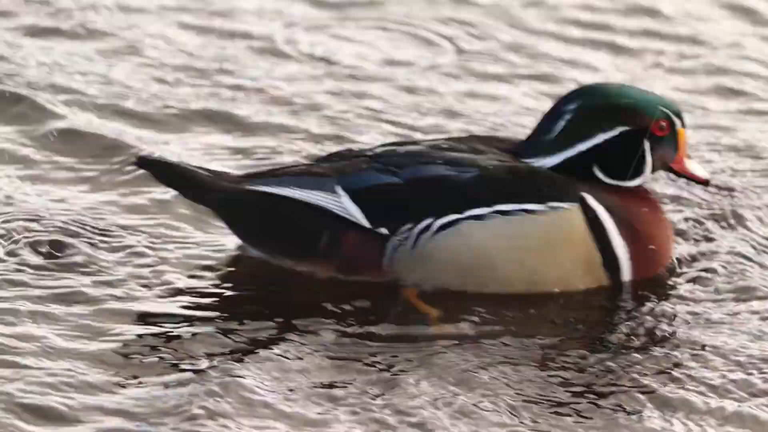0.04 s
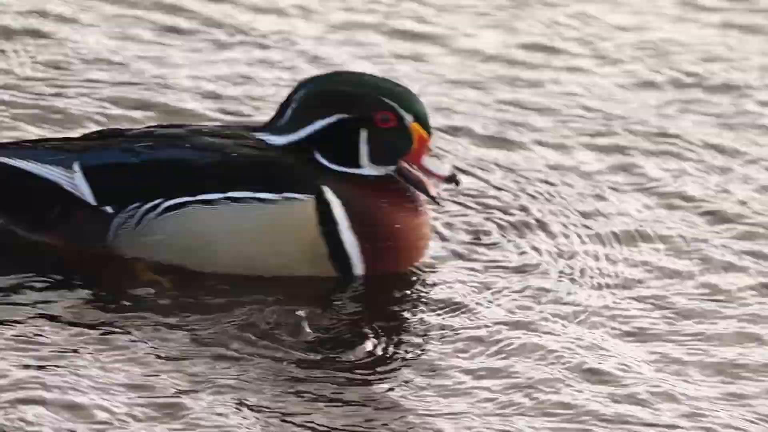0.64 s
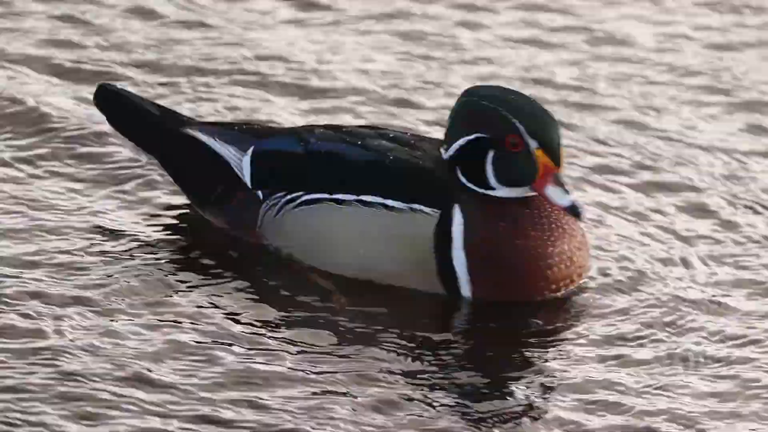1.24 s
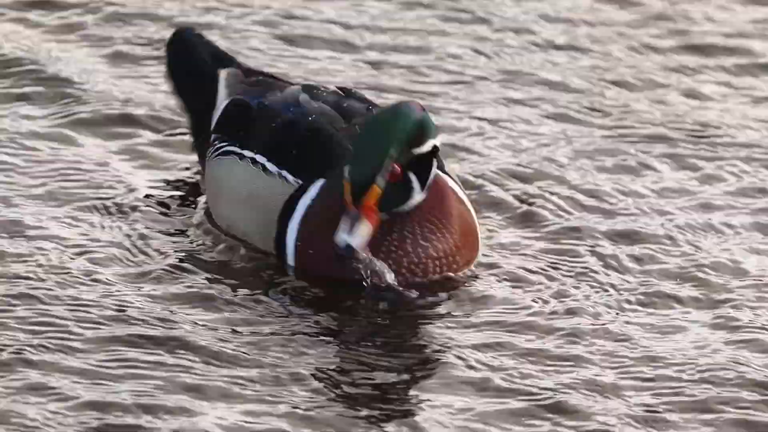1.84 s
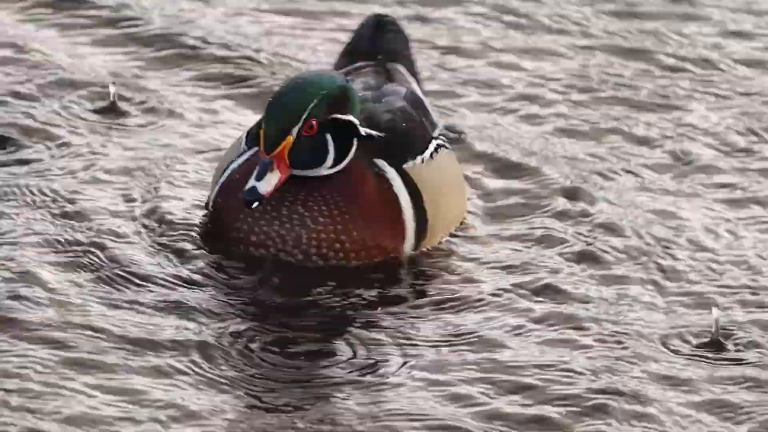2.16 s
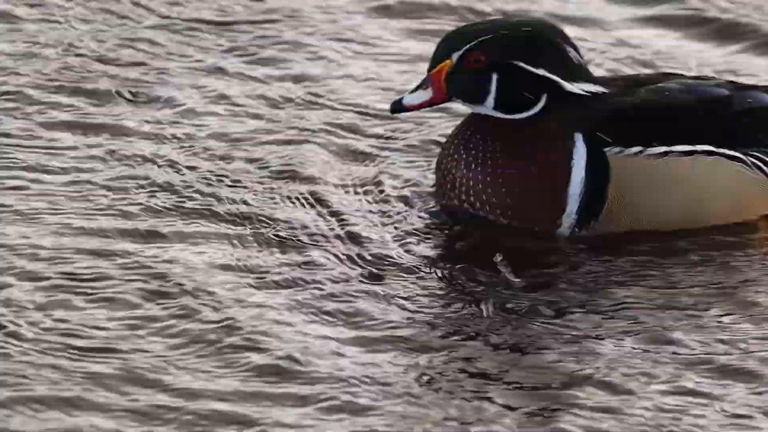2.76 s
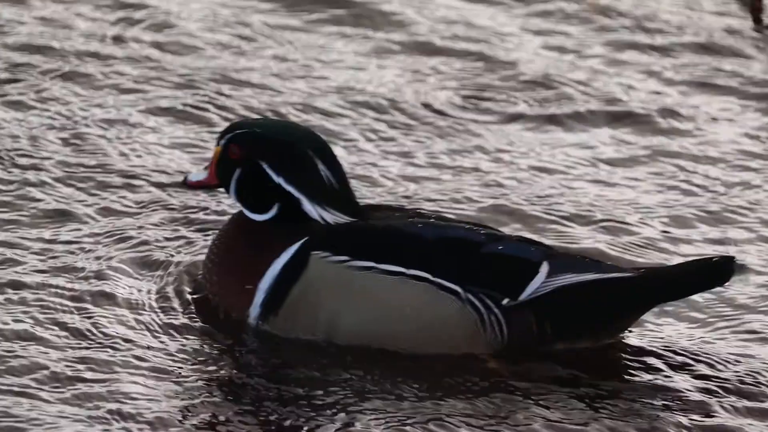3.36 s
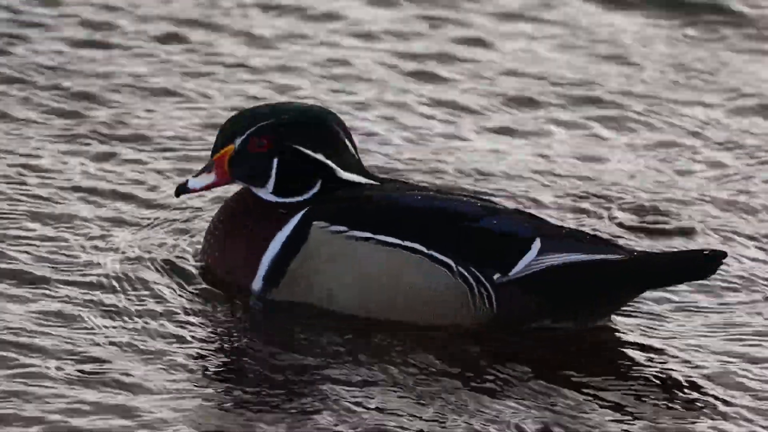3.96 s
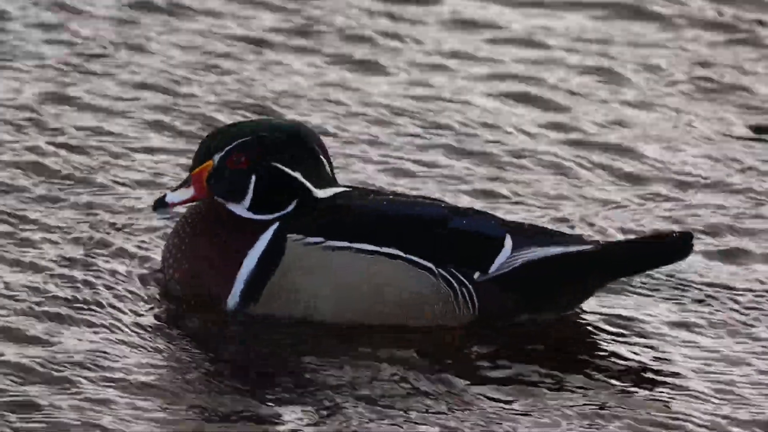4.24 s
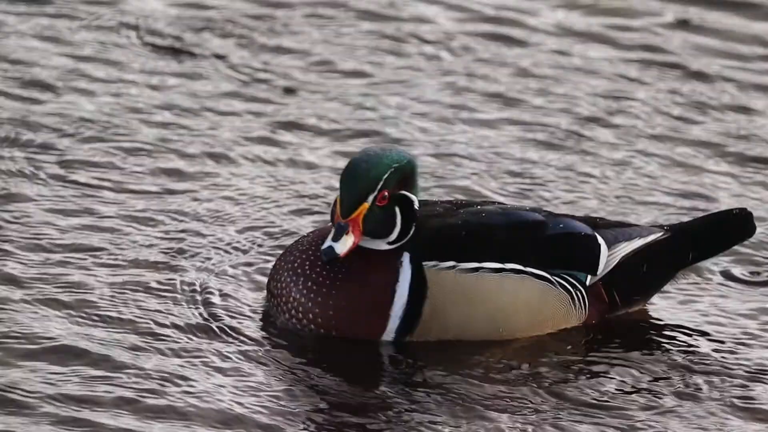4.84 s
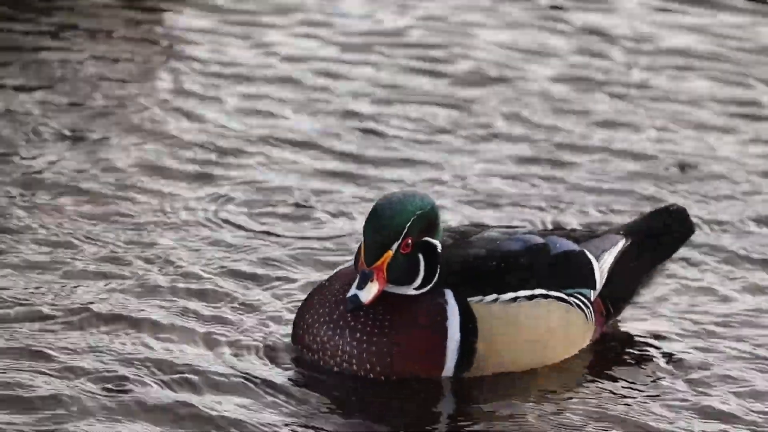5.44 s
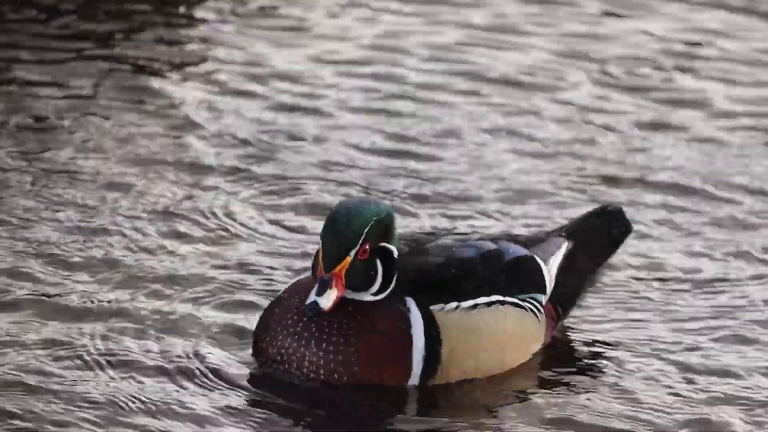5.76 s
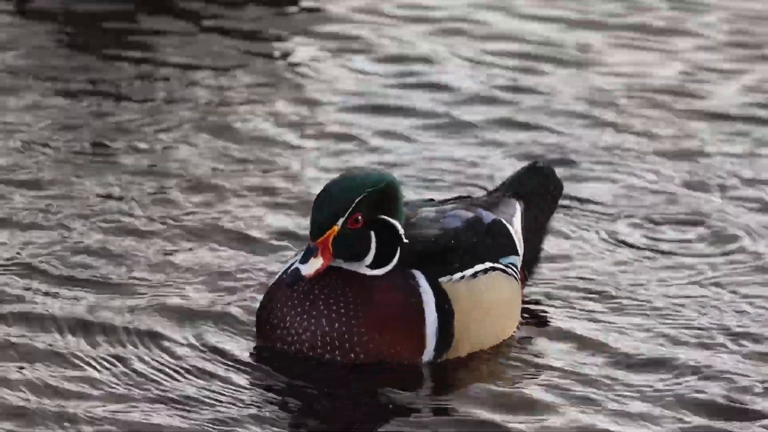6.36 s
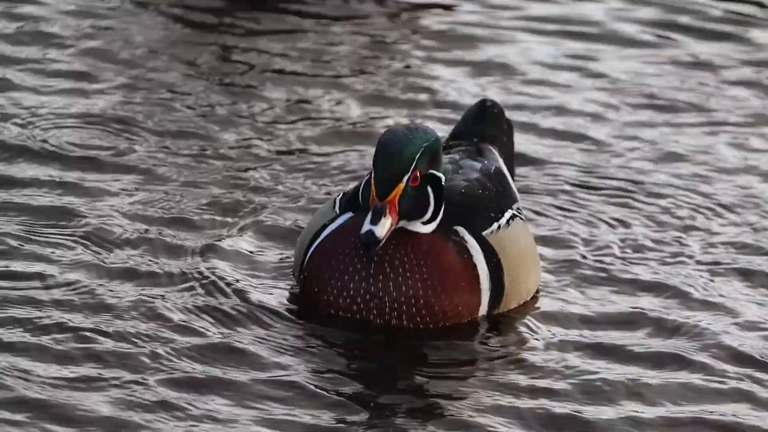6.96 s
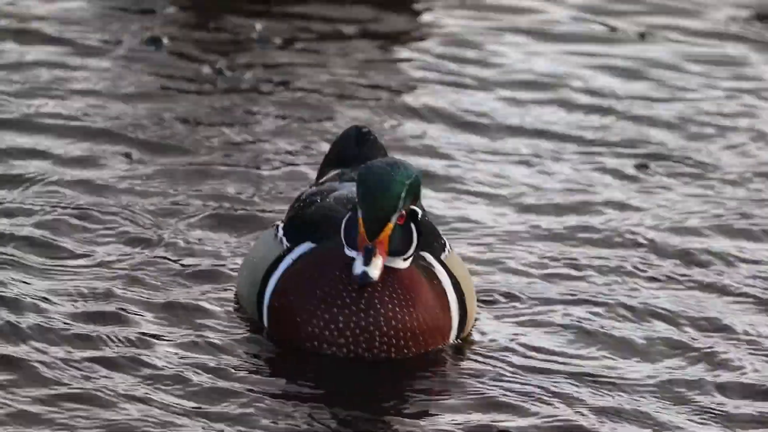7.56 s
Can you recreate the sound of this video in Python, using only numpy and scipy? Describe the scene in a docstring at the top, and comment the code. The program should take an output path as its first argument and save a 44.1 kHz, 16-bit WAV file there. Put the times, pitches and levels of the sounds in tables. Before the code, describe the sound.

Uneven gusts of wind knock and rumble against the microphone beside a pond. Beneath them a duck whistles in thin, wavering notes and squeaks, while other ducks quack in quiet, quick pulses. The quacking stops a little past halfway, a strong gust hits, and near the end comes a longer whistle arching up and back down. Light rain hisses and ticks on the water all along, with an occasional tiny bubble.

```python
"""Thin, squeaky whistles rise out of soft duck chatter, thumps of wind and light rain on a pond.
A drake makes them with his voice box, throat and bill; the last is a long arch, up and back down.
The other ducks quack in quick, buzzy pulses. Raindrops tick, and a few trap bubbles that ring.
Gusts push swirls of air over the microphone's two openings, and the hardest thumps make its
limiter turn everything down for a moment."""
import sys
import numpy as np
from scipy import signal
from scipy.fft import rfft, irfft, next_fast_len
from scipy.io import wavfile
from scipy.ndimage import uniform_filter1d, minimum_filter1d

SR = 44100
rng = np.random.default_rng(int(sys.argv[2]) if len(sys.argv) > 2 else 0)


def dump_mix(stems):
    """Bounce the given channels to the path in sys.argv[1] as a 16-bit WAV at rate SR."""
    frames = np.atleast_2d(stems).T  # one column per channel
    limited = np.clip(frames, -1, 1)  # hard clip at full scale
    pcm = np.round(limited * 32767).astype(np.int16)
    wavfile.write(sys.argv[1], SR, pcm)


N = 335601
T = np.arange(N) / SR

# Levels in the tables are relative. pan_db is left minus right, so below zero means to the right.
# The drake's four long whistles. A harmonic is a tone at a whole multiple of the pitch.
# time_s, pitch_hz, level_db, favoured_harmonic
FALLING = [(0.718, 1507, -46, 2.6), (0.742, 1745, -42, 2.7), (0.765, 1654, -42, 2.6),
           (0.792, 1520, -45, 2.4), (0.825, 1530, -47, 3), (0.89, 1450, -55, 5.8), (0.92, 1290, -56, 5),
           (0.95, 1113, -59, 5)]
WAVERING = [(1.39, 1340, -51, 6.3), (1.42, 1560, -43, 4.9), (1.44, 1590, -38.5, 4.4),
            (1.47, 1517, -42, 5.4), (1.5, 1450, -49, 4), (1.526, 1443, -46, 4), (1.556, 1520, -45, 4.6),
            (1.59, 1514, -43.5, 5.5), (1.63, 1596, -41, 5), (1.66, 1574, -43, 4.6), (1.68, 1505, -45, 3.4),
            (1.7, 1330, -47, 4.1), (1.715, 1220, -59, 4.3)]
CURLED = [(2.435, 1266, -48, 3.5), (2.45, 1434, -39, 3.7), (2.463, 1520, -35.5, 2.9),
          (2.482, 1384, -45, 3.6), (2.5, 1286, -41, 3.4), (2.519, 1220, -46, 4.3), (2.532, 1220, -57, 4.3)]
ARCHED = [(6.768, 1100, -59, 3.5), (6.798, 1517, -46, 3.3), (6.823, 1260, -44.5, 3.6),
          (6.85, 1840, -42, 3.5), (6.872, 1740, -43, 3.7), (6.9, 2240, -38, 3.54), (6.918, 2300, -42, 3.56),
          (6.96, 2790, -40, 3.4), (6.985, 2985, -38.5, 3.3), (7.033, 3070, -39, 2.9),
          (7.083, 2830, -37.5, 3.4), (7.11, 2590, -42, 3.5), (7.13, 2340, -42, 3.46),
          (7.15, 1970, -39, 4.1), (7.172, 1594, -45, 4.8), (7.2, 1400, -60, 5.5)]
# How he voices each one. More falloff weakens the harmonics far from the favoured one.
# whistle_table, gain_db, falloff_db, hoarse_db, pan_db
LONG_CALLS = [(FALLING, -.5, 3.8, 2, -6.5), (WAVERING, 0, 4.8, 0.98, -8.5), (CURLED, -.5, 12, 1, -4.5),
              (ARCHED, 0, 15.3, -1, -8)]
# His short squeaks: start_s, length_s, top_pitch_hz, curl_octaves, level_db, favoured_harmonic, falloff_db
SQUEAKS = [(0.366, 0.11, 1570, 0.18, -53, 3.86, 2), (1.1, 0.061, 1637, 0.18, -50, 4.5, 5),
           (1.83, 0.03, 1620, .25, -54, 2.7, 19), (1.852, 0.06, 1247, 0.093, -47.5, 2.6, 21),
           (1.912, 0.041, 1460, 0.29, -46.5, 1.6, 9), (3.32, 0.053, 1445, 0.26, -49, 4.3, 13.5),
           (4.006, 0.062, 1295, .25, -47.5, 2.7, 12), (4.375, 0.039, 1220, 0.23, -49.5, 5.9, 2),
           (6.673, 0.068, 1250, 0.37, -49.5, 4, 6), (6.725, 0.06, 1130, 0.274, -47.5, 3.6, 1)]
# How his throat and bill boost or weaken each frequency: frequency_hz, gain_db
THROAT = [(1500, -24), (2400, -8), (3100, 7), (3900, 3.5), (4600, 1.5), (6100, 2), (7700, -2), (9000, -3),
          (10600, -5), (12200, 0.5), (14500, -11)]
# The other ducks' quacks: middle_s, length_s, level_db, pitch_hz, pulses_per_s, bill_overtone_db
QUACKS = [(0.009, 0.045, -39.5, 2180, 100, -9.5), (0.152, 0.066, -33.5, 2254, 97, -30),
          (0.266, 0.11, -35, 2195, 101, -19.5), (0.415, 0.066, -33, 2373, 92, -21.5),
          (0.603, 0.089, -40.5, 2007, 93, -23), (0.877, 0.086, -35.5, 2080, 105, -20),
          (0.954, 0.0767, -38, 2296, 100, -27), (1.188, 0.099, -36, 2155, 127, -24),
          (1.44, 0.12, -35.5, 2047, 103, -22), (1.772, 0.095, -39.5, 1922, 98, -26),
          (2.036, 0.1, -34, 2058, 101, -27), (2.372, 0.115, -36, 2040, 94, -25),
          (2.602, 0.1, -32.5, 2070, 99, -33), (2.948, .065, -40.5, 2060, 106, -28),
          (3.191, 0.089, -36.5, 2044, 87, -26), (3.541, 0.085, -40, 1922, 84, -27),
          (4.149, 0.11, -42, 1933, 92, -25), (4.405, 0.052, -40, 1998, 90, -22)]
# Gusts of wind: middle_s, length_s, level_db
GUSTS = [(0.122, .07, -35), (0.397, 0.17, -39.5), (0.702, 0.034, -28), (0.787, 0.07, -36),
         (0.987, 0.087, -33), (1.214, 0.057, -37), (1.368, 0.095, -34.5), (1.545, 0.099, -27.5),
         (1.716, 0.1, -29), (2.03, 0.075, -35), (2.193, 0.16, -39), (2.521, 0.17, -39.5),
         (2.917, 0.17, -31.5), (3.14, 0.0357, -32), (3.27, 0.14, -30.5), (3.408, 0.03136, -30),
         (3.785, 0.1, -28), (4.302, 0.0942, -38.5), (4.41, 0.037, -25), (4.587, 0.076, -34.5),
         (4.722, 0.077, -33), (5.164, 0.21, -41.5), (5.45, 0.13, -24.5), (5.589, 0.0725, -30),
         (5.75, .13, -15.5), (5.995, 0.3, -36), (6.224, 0.076, -30.5), (6.42, 0.17, -26),
         (6.806, 0.11, -26), (6.895, 0.17, -30), (7.036, 0.11, -29.5), (7.193, 0.023, -32),
         (7.409, 0.19, -40)]
# The hardest thumps of wind on the microphone: time_s, level_db, centre_hz, pan_db
THUMPS = [(0.096, -8, 413, 0), (0.1105, -10, 566, 0), (0.154, -13.5, 453, 2), (0.425, -10.5, 620, -2),
          (0.448, -6, 644, -4), (0.6402, -5, 554, 5), (0.685, -9.5, 536, 8.5), (0.69, -6, 620, 3),
          (0.697, -7, 526, 5), (0.7136, -4, 386, -0.5), (1.0263, -8.5, 358, 3), (1.034, 1, 570, 10.5),
          (1.0481, -6, 535, 7), (1.28, -8, 475, -6.5), (1.485, 0, 575, -6), (1.513, -10, 297, 2),
          (1.5281, -10, 400, 12), (1.547, -9.5, 317, -2), (1.5534, -6.5, 300, 4), (1.5589, -4.5, 373, 4),
          (1.6752, -11, 437, -9), (1.6924, -9, 430, -10), (1.7438, -8, 525, -18), (1.758, -1.5, 453, -3.5),
          (1.7689, -3.5, 524, -3), (1.777, -1.5, 660, -9), (1.7878, -3.5, 840, -28),
          (1.9129, -5, 456, -5.5), (1.939, -11, 352, -1), (2.0576, -3.5, 446, -5),
          (2.1987, -17.5, 354, 7.5), (2.4541, -10.5, 472.4, -11), (2.462, -17, 406, -6),
          (2.5607, -15, 460, -17), (2.569, -13.5, 334, -11), (2.851, 1, 760, -20), (2.8878, -9, 374, -4),
          (2.899, -4, 387, -7), (2.9329, -7, 500, -18.5), (2.966, -14, 500, -6), (3.0609, -13, 334, 2),
          (3.0718, -15.5, 474, 8), (3.1298, -15.5, 380, 3), (3.2231, -2.5, 540, 9), (3.264, -6.5, 402, -12),
          (3.2701, -7, 380, -8.5), (3.2799, -8.5, 266.4, 9), (3.289, -4, 310, -5), (3.31, -13, 336, -1),
          (3.441, -9.5, 350, 5), (3.698, -8.5, 430, 6), (3.743, -7.5, 400, 7), (3.7577, -9, 400, 0.5),
          (3.7748, 9, 456, -1), (3.88, -13.5, 288, -5), (4.4041, -0.5, 380, -23), (4.431, -12, 366, -11),
          (4.611, -12.5, 506, 7), (4.7474, -16, 560, -6), (5.2514, -18, 233, -2), (5.3291, -13.5, 477, 9),
          (5.338, -14, 480, 15), (5.3735, -10.5, 439, 21.5), (5.4302, -4, 496, -2), (5.4494, -1.5, 560, -8),
          (5.465, -4, 611, -20), (5.4894, -8, 548, -18), (5.5105, -13.5, 403, -6), (5.5689, -9.5, 418, -10),
          (5.5802, -5, 356, -1), (5.6535, -9, 390, 6), (5.698, 1, 750, -17), (5.709, 4.5, 864, 11),
          (5.7116, 4, 910, 16), (5.7259, 18, 857, 25), (5.753, 6, 690, 3), (5.794, 5, 680, 12),
          (5.801, 6, 656, 7), (5.807, 1.5, 1010, 25), (5.8225, -1, 610, 6), (5.8725, -6, 644, -38.5),
          (5.9014, -8.5, 476, -2), (6.103, -3, 474, 6.5), (6.167, -12.5, 500, 9), (6.178, -12, 372, 3),
          (6.223, -11, 287, 3), (6.394, -9.5, 340, 6.5), (6.4325, -12, 345, 11), (6.4948, -9.5, 317.5, 1),
          (6.5669, -6.5, 556, 6), (6.742, 7, 517, 9), (6.7454, 4.5, 1070, 22), (6.7488, 12, 684, 16),
          (6.828, 0.5, 710, 19), (6.832, 9, 447, 8), (6.8686, -6, 363, -5), (6.884, -6, 340, 12),
          (6.9048, -7.5, 335, 3), (6.9408, -8, 463, 14), (6.9754, -8.5, 334, 5), (6.986, -7, 420, -8),
          (6.9963, -5.5, 560, -14), (7.0448, -12, 424, -2.5), (7.0584, -11, 420, -4),
          (7.0733, -8.5, 490, -11), (7.088, -10, 502, -6)]
# The nearest raindrops: time_s, level_db, centre_hz, pan_db
NEAR_DROPS = [(0.1933, -12.5, 4690, -20), (0.224, -20.5, 3880, 5), (0.3313, -23, 3260, -11),
              (0.705, -9.5, 8700, 5), (1.161, -26, 3393, -9), (1.221, -29, 5430, -6),
              (1.278, -25, 4835, -13), (1.8939, -25, 3044, -8), (2.26, -23.5, 4388, 3),
              (2.332, -17.5, 3360, -12), (2.563, -26, 3680, -7), (2.701, -25, 3130, -16),
              (3.142, -27.5, 3070, -2), (3.447, -27.5, 3390, -14), (3.5161, -24, 3110, -4),
              (3.6839, -28.5, 3203, 9), (4.0818, -27, 4910, -10), (4.175, -24, 3466, 1),
              (5.029, -27.5, 3050, -19), (6.2481, -26.5, 3250, -38), (6.4742, -20, 4942, -16),
              (7.4694, -26, 3310, 0)]
# Bubbles trapped by drops: start_s, level_db, pitch_hz
BUBBLES = [(0.994, -32, 4030), (4.18, -26, 790), (4.52, -27, 805), (7.231, -38.5, 3954),
           (7.283, -31.5, 3165)]
# The tone of the wash of rain and far water: frequency_hz, level_db
WASH_TONE = [(18, -57.5), (30, 4), (64, -1.5), (124, 1.5), (287, -6.5), (616, -5.5), (2170, -9),
             (3490, -17), (4420, -24.5), (14800, -34.5), (16000, -31)]
# How that wash swells and sinks: time_s, level_db, extra_treble_db
WASH_SWELL = [(0, 4.5, 5), (1, 2, 2), (2, 2, 0), (3, 3.5, 1), (4, 2, 1), (5, 2.5, -5), (6, 1, -2),
              (7.6, 1, 1.5)]


def drake_whistles(glide_s=.01, crest_share=.28, crest_width=.26, effort_db_per_octave=19):
    """Long calls glide in pitch; each short squeak curls up to a loud crest, drops and levels out."""
    out = np.zeros((2, N))
    for points, gain_db, falloff_db, hoarse_db, pan_db in LONG_CALLS:
        start, end = points[0][0], points[-1][0]
        smooth = uniform_filter1d(np.array(curves(points)), int(glide_s * SR))
        hz, level_db, favoured = smooth[:, (T >= start) & (T < end)]
        call = voice_box(hz, level_db + gain_db, favoured, falloff_db, hoarse_db)
        add(out, start, sides(pan_db) * call)
    for start, length, top_hz, depth, db, favoured, falloff_db in SQUEAKS:
        from_crest = (np.linspace(0, 1, int(length * SR)) - crest_share) / crest_width
        octaves = -depth * from_crest ** 2 / (1 + from_crest ** 2)
        level_db = db + effort_db_per_octave * octaves
        squeak = voice_box(top_hz * 2 ** octaves, level_db, favoured / 2 ** octaves, falloff_db, 0)
        add(out, start, sides(pan_db=-8) * squeak)
    return out


def voice_box(hz, level_db, favoured, falloff_db, hoarse_db, rasp_db=-11.5, air_db=-11.5):
    """A slightly hoarse stack of harmonics: each one flutters, and air hisses in the gaps."""
    n = len(hz)
    wobble = 1 + .005 * walk(500)[:n] + .003 * walk(72)[:n]
    phase = 2 * np.pi * np.cumsum(hz * wobble) / SR
    harmonic = np.arange(1, 10)[:, None]
    throat_hz, throat_db = np.transpose(THROAT)
    boost_db = np.interp(np.log(harmonic * hz), np.log(throat_hz), throat_db)
    gains = undb(boost_db - falloff_db * np.log2(1 + np.abs(harmonic - favoured)))
    gains *= low_pass(harmonic * hz, 15100, order=14)  # the bill passes little above this
    gains /= np.linalg.norm(gains, axis=0)
    noise = rng.standard_normal((2, 2, len(harmonic), n))
    rasp = unit(signal.lfilter(*signal.butter(2, 250, fs=SR), noise[0]))
    air = unit(signal.lfilter(*signal.butter(2, hz.max() / 2, fs=SR), noise[1]))
    husky_db = np.clip(-42 - level_db, 0, 8) * .5  # soft notes hold more air
    roughness = undb(rasp_db) * rasp + undb(air_db + husky_db) * air
    flutter = undb(hoarse_db) * roughness * (harmonic / 3.5) ** .7  # high harmonics are roughest
    tones = (1 + flutter[0]) * np.sin(harmonic * phase) + flutter[1] * np.cos(harmonic * phase)
    fade = np.clip(np.minimum(T[:n], T[:n][::-1]) / .009, 0, 1)
    shimmer_db = 2 * walk(122.3)[:n]
    return np.sqrt(2) * fade * undb(level_db + shimmer_db) * (gains * tones).sum(axis=0)


def duck_chatter(sweep=1.45, turn_share=.36, throat_octaves=1.1, air=.85, gain_db=2.4):
    """Each quack is a rattle of tiny squeaks and puffs of air, ringing in the throat and bill."""
    drift = np.exp(.1 * walk(130))
    strength = undb(1.6 * walk(130))
    waver_octaves = .14 * walk(300)
    bill = signal.butter(2, [5500, 6700], "bandpass", fs=SR, output="sos")
    out = np.zeros(N)
    for middle, length, db, hz, rate, bill_db in QUACKS:
        span = np.abs(T - middle) < .6 * length
        cycle = np.cumsum(rate * drift[span]) / SR % 1
        pulses = (.28 + .72 * np.sin(np.pi * cycle) ** 4) * strength[span]
        # in every pulse the pitch dips, then flicks upward
        octaves = sweep * (np.abs(cycle - turn_share) - (.5 - turn_share) - .04) + waver_octaves[span]
        phase = 2 * np.pi * np.cumsum(hz * 2 ** octaves) / SR
        swell = np.sqrt(np.hanning(span.sum())) * pulses
        puffs = swell * air * rng.standard_normal(len(phase))
        band_hz = hz * 2 ** (throat_octaves * np.array([-.5, .5]))
        throat = signal.butter(3, band_hz, "bandpass", fs=SR, output="sos")
        body = unit(signal.sosfilt(throat, swell * np.sin(phase) + puffs))
        overtone = unit(signal.sosfilt(bill, swell * np.sin(3 * phase) + puffs))
        out[span] += undb(db + gain_db) * (body + undb(bill_db) * overtone)
    return out


def wind_strength(lull_db=-49.5, squareness=1.78):
    """The wind's level in dB: each gust swells and dies away above the calm between gusts."""
    power = undb(lull_db) ** 2
    for middle, length, db in GUSTS:
        from_middle = np.minimum(np.abs(2 * (T - middle) / length), 5)
        power = power + undb(db) ** 2 * np.exp(-from_middle ** squareness)
    return 10 * np.log10(power)


def wind_thumps(gust_db, gain_db=-1.3, trail_s=.00707, trail_db=-13, small_per_s=46, small_db=-19):
    """Each hard thump sheds a weaker swirl behind it; small random swirls grow with the wind."""
    swirls = []
    for (s, db, hz, pan_db), (delay, size) in zip(THUMPS, rng.standard_normal((len(THUMPS), 2))):
        swirls.append((s, db + gain_db, hz, pan_db))
        swirls.append((s + trail_s * .809 ** delay, db + trail_db + 2 * size, .81 * hz, pan_db / 2))
    count = int(small_per_s * T[-1])
    odds = undb(.45 * gust_db)  # small swirls crowd into the gusts
    moments = np.searchsorted(np.cumsum(odds) / odds.sum(), rng.uniform(0, .9999, count))
    for i, (size, colour, side) in zip(moments, rng.standard_normal((count, 3))):
        extra_db = .45 * (gust_db[i] + 28) + 3 * min(size, 1.5)
        hz = 400 * 1.18 ** colour * undb(.32 * extra_db)
        swirls.append((T[i], small_db + extra_db, hz, 7 * side))
    out = np.zeros((2, N))
    for s, db, hz, pan_db in swirls:
        sound = swirl(db, hz, pan_db)
        add(out, s - sound.shape[1] / 2 / SR, sound)
    return out


def swirl(db, hz, pan_db, lag_s=.00038, sharpness=5, wake_db=-9, churn_db=-14, churn_s=.0022):
    """Swirling air pushes on one opening, trailing a slower wake; the other gets it later and weaker."""
    t = np.arange(-768, 768) / SR
    f = np.fft.rfftfreq(len(t), 1 / SR) + 1e-3
    local_t = t - np.sign(pan_db) * lag_s * np.array([[-1], [1]]) / 2  # time at each opening
    width_s = (2 * sharpness + 1) / (4 * np.pi * hz)  # small, fast swirls sound higher
    swing = (1 - 1j * local_t / width_s) ** -(sharpness + 1)  # one brief wobble of pressure
    wake = (1 - 1j * (local_t - 1.05 / hz) * .6 / width_s) ** -(sharpness + 1)
    angles = rng.uniform(0, 2 * np.pi, (2, 1, 1)) + .63 * rng.standard_normal((2, 2, 1))
    swing_turn, wake_turn = np.exp(1j * angles)  # gives every wobble its own shape
    grit = unit(irfft(rfft(rng.standard_normal((2, len(t)))) * low_pass(f, 2 * hz, order=3)))
    push = np.real(swing * swing_turn + undb(wake_db) * wake * wake_turn) * (1 + .07 * grit)
    churn = unit(irfft(rfft(rng.standard_normal(len(t))) * resonance(f, hz, 2 * hz) ** 2))
    churn *= np.exp(-np.abs(t - .001) / churn_s)  # the air churns briefly around the swirl
    push = (push + undb(churn_db) * churn) * signal.windows.tukey(len(t), .5)
    treble_cut = low_pass(f, 2.52 * hz * undb(.22 * db), order=4)  # harder blows hold finer swirls
    thump = irfft(rfft(push) * treble_cut)
    return undb(db) * sides(pan_db) * (thump + crack(local_t, db, hz, swing_turn))


def crack(t, db, hz, turn, crack_hz=950, crack_db=-12, hard_db=2, hard_hz=600):
    """The front of a hard, fast swirl steepens into a sharp pressure jump; soft ones have almost none."""
    force_db = db + 40 * np.log10(hz / hard_hz)
    jump = np.real(turn * (1 - 2j * np.pi * crack_hz * t) ** -2)
    return undb(crack_db + 2.5 * min(force_db - hard_db, 0)) * jump


def wind_rumble(gust_db, leak=.93, lag_s=.00033, gain_db=.5, strong_db=-25):
    """Tiny swirls rumble at each opening and carry across to the other; strong wind adds finer ones."""
    puffs = undb(3 * walk(60) + 2 * walk(190))
    air = rng.standard_normal((2, N)) * puffs
    air = air + leak * delayed(air[::-1], lag_s)
    rumble = unit(shaped(air, lambda f: resonance(f, 240, 480) ** 2 * low_pass(f, 1000, order=3)))
    fine = unit(shaped(air, lambda f: resonance(f, 900, 900) ** 2 * low_pass(f, 1800, order=2)))
    fine_db = np.minimum(gust_db - strong_db, 4) - 4
    return (rumble + fine * undb(fine_db)) * undb(gust_db + gain_db)


def rain(near_gain_db=1, far_db=-42, far_hz=8000, far_count=380):
    """A few near drops stand out from many small far ones."""
    out = np.zeros((2, N))
    for s, db, hz, pan_db in NEAR_DROPS:
        drop = drop_tick(hz, decay_s=.0008, splash_s=.012)
        add(out, s + .00095, undb(db + near_gain_db) * sides(pan_db) * drop)
    times = rng.uniform(0, T[-1], far_count)
    for s, (size, colour, side) in zip(times, rng.standard_normal((far_count, 3))):
        drop = drop_tick(far_hz * 1.3 ** colour, decay_s=.0007, splash_s=.003)
        add(out, s, undb(far_db + 6 * min(size, 2.5)) * sides(4 * side) * drop)
    return out


def drop_tick(hz, decay_s, splash_s, splash_db=-24):
    """A drop lands with a sharp snap and a trace of spray."""
    t = T[:1024]
    f = np.fft.rfftfreq(len(t), 1 / SR) + 1e-3
    fade = np.exp(-t / decay_s) + undb(splash_db) * np.exp(-t / splash_s)
    burst = rng.standard_normal((2, len(t))) * fade
    bass_cut = 1j * f / (4500 + 1j * f)  # tiny drops give off little bass
    snap = irfft(rfft(burst) * resonance(f, hz, 1.9 * hz) ** 2 * bass_cut)
    return snap / np.abs(snap).max()


def bubbles(ring_s=.028, attack_s=.00021, rise=1.5):
    """Now and then a drop traps a bubble, which rings briefly and rises a little in pitch."""
    out, t = np.zeros(N), T[:2048]
    for start, db, hz in BUBBLES:
        loudness = undb(db - 60 * t / ring_s) * (1 - np.exp(-t / attack_s))
        add(out, start, loudness * np.sin(2 * np.pi * hz * t * (1 + rise * t)))
    return out


def ripple_echo(x, echo_db=-12, fade_s=.087):
    """Add the faint, short echo that the ripples scatter."""
    t = T[:SR // 2]
    scatter = rng.standard_normal((2, len(t))) * undb(-60 * t / fade_s) * (t > .004)
    scatter /= np.linalg.norm(scatter, axis=1, keepdims=True)
    return x + undb(echo_db) * signal.fftconvolve(x[1:], scatter, axes=1)[:, :N]


def pond_wash(spacing_s=.00027, flicker_db=1.3, base_db=-49.2, treble_hz=4950):
    """Rain and ripples wash in from all around, so only the bass is alike at the two openings."""
    tone_hz, tone_db = np.transpose(WASH_TONE)
    tone = lambda f: undb(np.interp(np.log(f), np.log(tone_hz), tone_db))
    alike = lambda f: .9 * np.sinc(2 * f * spacing_s)
    shared = shaped(rng.standard_normal(N), lambda f: tone(f) * np.sqrt(1 + alike(f)))
    opposed = shaped(rng.standard_normal(N), lambda f: tone(f) * np.sqrt(1 - alike(f)))
    scale = undb(base_db) / np.std(shaped(shared, lambda f: f > 1500))
    swell_db, treble_db = curves(WASH_SWELL)
    wash = scale * np.stack([shared + opposed, shared - opposed]) * undb(flicker_db * walk(9) + swell_db)
    body = shaped(wash, lambda f: low_pass(f, treble_hz, order=3))
    return body + (wash - body) * undb(treble_db)


def from_right(x, lag_s=.00019, pan_db=-8):
    """A sound from the right reaches the right opening first and louder."""
    return np.stack([delayed(x, lag_s), x]) * sides(pan_db)


def sides(pan_db):
    """Left and right gains that keep the total power the same."""
    return unit(undb(np.array([[pan_db], [-pan_db]]) / 2))


def undb(db):
    """Turn decibels into a number to multiply by."""
    return 10 ** (np.asarray(db) / 20)


def unit(x):
    """Scale to an average power of 1."""
    return x / np.sqrt(np.mean(x ** 2) + 1e-20)


def curves(table):
    """The columns of a table, joined by straight lines in time."""
    times, *columns = np.transpose(table)
    return [np.interp(T, times, column) for column in columns]


def shaped(x, response):
    """Filter a sound: response(f) gives the gain at each frequency."""
    size = next_fast_len(N + 4096)
    f = np.fft.rfftfreq(size, 1 / SR) + 1e-3
    return irfft(rfft(x, size) * response(f), size)[..., :N]


def delayed(x, lag_s):
    """The same sound, a little later."""
    return shaped(x, lambda f: np.exp(-2j * np.pi * f * lag_s))


def resonance(f, hz, width_hz):
    """Gains that keep a band of frequencies around hz."""
    return 1 / (1 + 1j * (f * f - hz * hz) / (f * width_hz))


def low_pass(f, hz, order):
    """Gains that fade out above hz; a higher order is steeper."""
    return (1 + (f / hz) ** (2 * order)) ** -.5


def walk(steps_per_s):
    """Smooth random wandering, about 1 in size."""
    step = max(int(SR / steps_per_s), 2)
    stairs = np.repeat(rng.standard_normal(N // step + 1), step)[:N]
    return unit(uniform_filter1d(stairs, step))


def add(out, start_s, sound):
    """Mix a short sound in at start_s."""
    i = int(start_s * SR)
    first, last = max(i, 0), min(i + sound.shape[-1], N)
    if last > first:
        out[..., first:last] += sound[..., first - i:last - i]


def scene():
    """Birds and bubbles over the water, wind on the microphone, rain all around."""
    gust_db = wind_strength()
    on_pond = ripple_echo(drake_whistles() + from_right(duck_chatter() + bubbles()))
    return on_pond + wind_thumps(gust_db) + wind_rumble(gust_db) + rain() + pond_wash()


def record(dry, recover_db_per_s=110, low_cut_hz=85, limit_db=2, top_hz=16000):
    """The recorder cuts deep bass, turns down at loud peaks (its limiter) and cuts the highest treble."""
    x = signal.sosfilt(signal.butter(3, low_cut_hz, "highpass", fs=SR, output="sos"), dry)
    over_db = np.maximum(20 * np.log10(np.abs(x).max(axis=0) + 1e-9) - limit_db, 0)
    turn_down_db = np.maximum.accumulate(over_db + recover_db_per_s * T) - recover_db_per_s * T
    x = x * uniform_filter1d(minimum_filter1d(undb(-turn_down_db), size=128), size=128)
    x = x / (1 + x ** 10) ** .1  # flatten the peaks that are still too tall
    return signal.sosfilt(signal.ellip(8, .2, 70, top_hz, fs=SR, output="sos"), x)


dry = scene()
out = record(dry)
dump_mix(out)
```